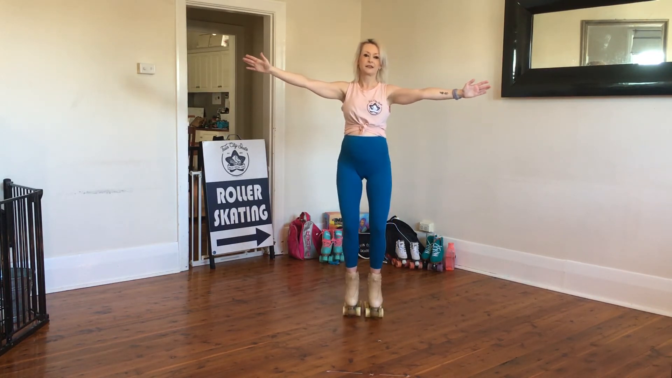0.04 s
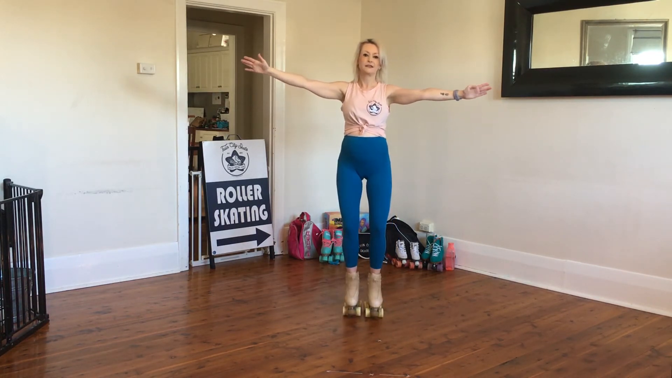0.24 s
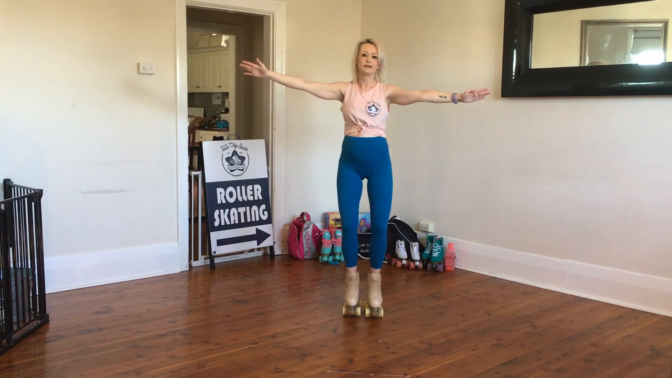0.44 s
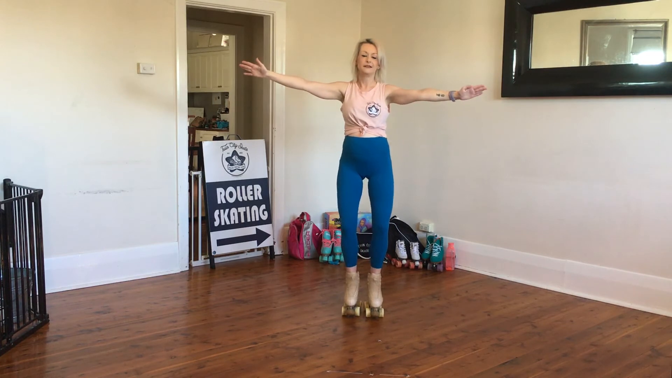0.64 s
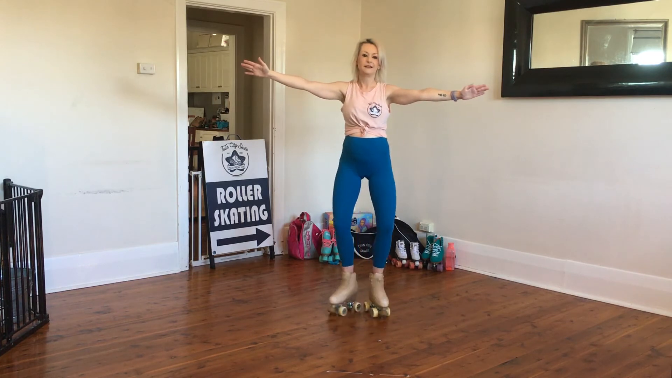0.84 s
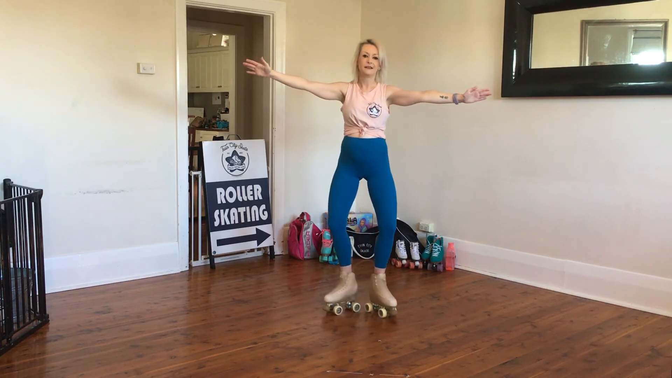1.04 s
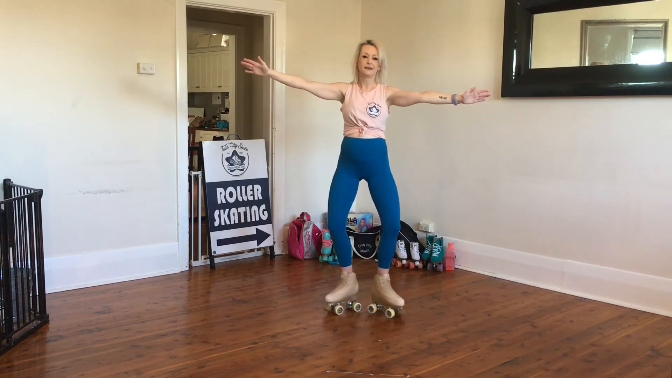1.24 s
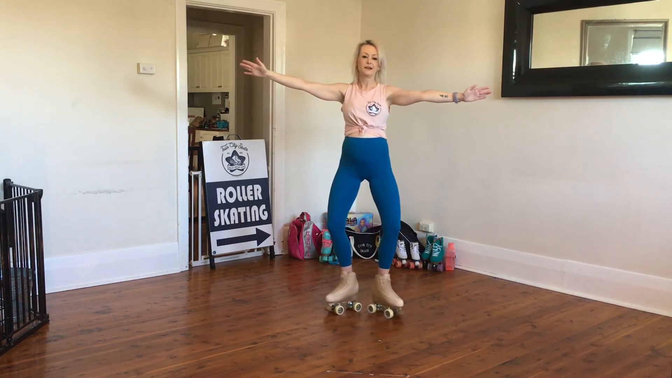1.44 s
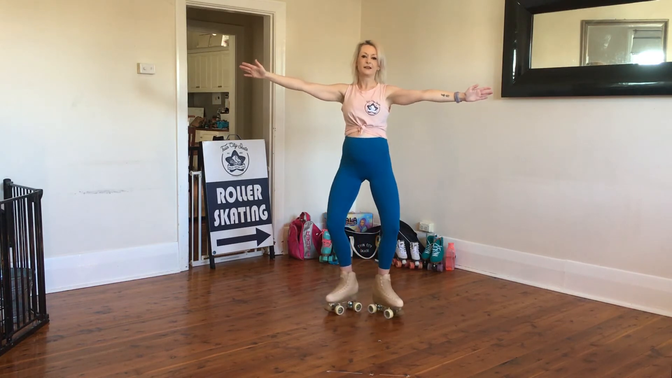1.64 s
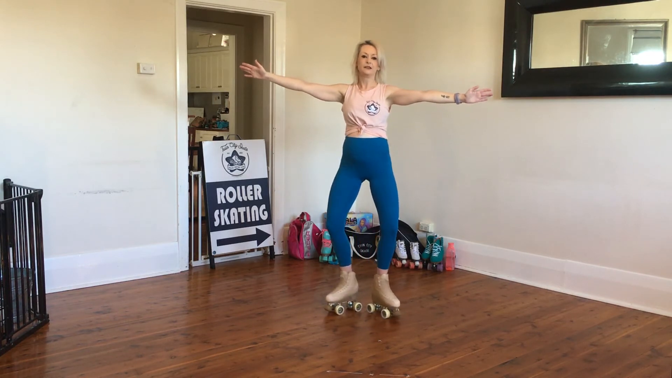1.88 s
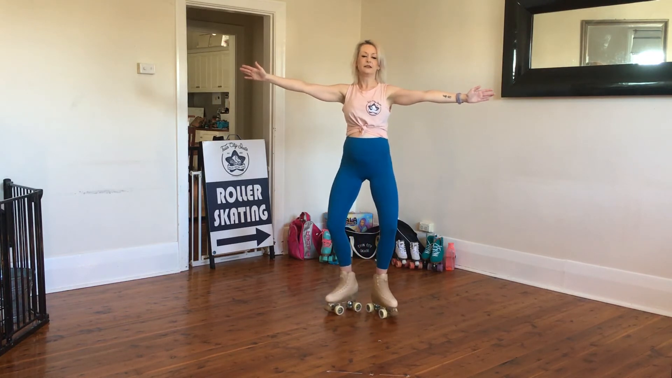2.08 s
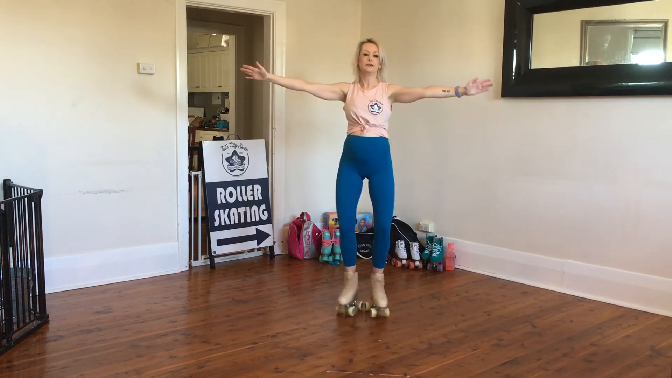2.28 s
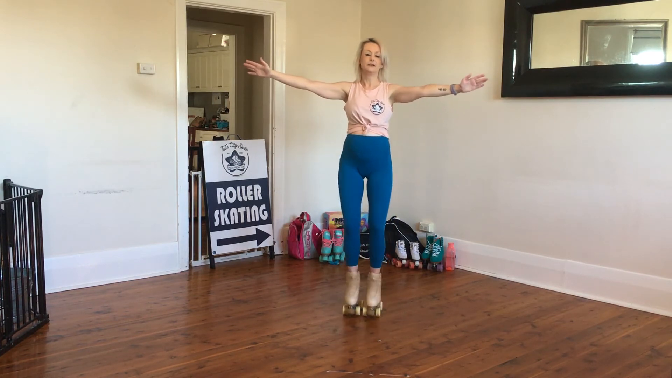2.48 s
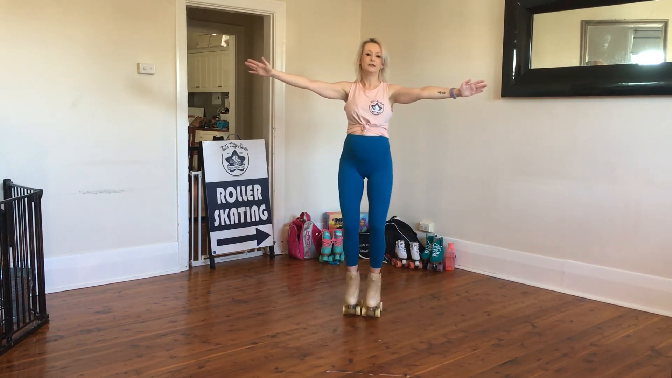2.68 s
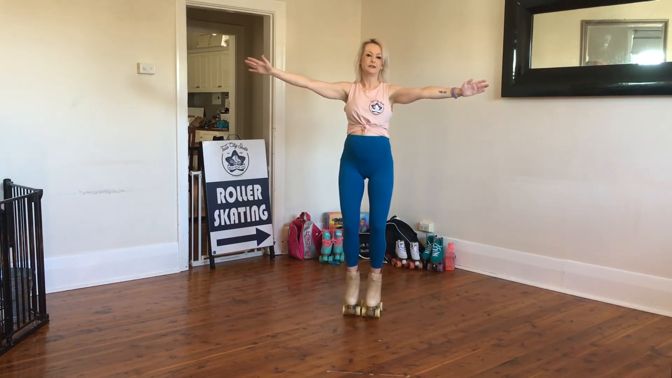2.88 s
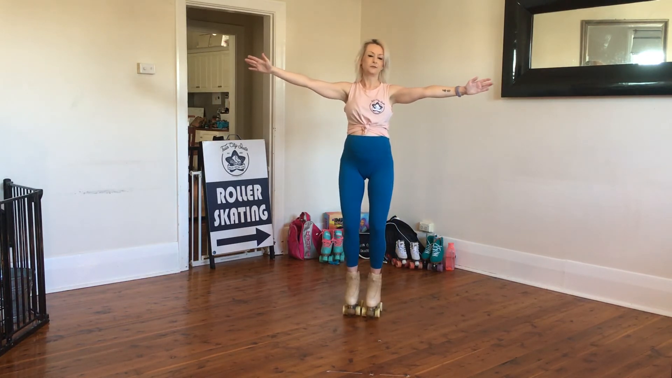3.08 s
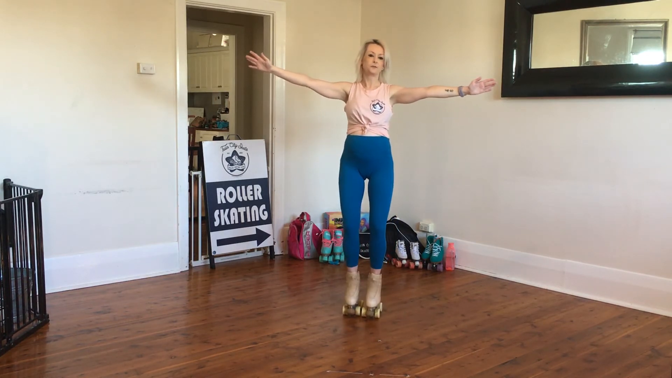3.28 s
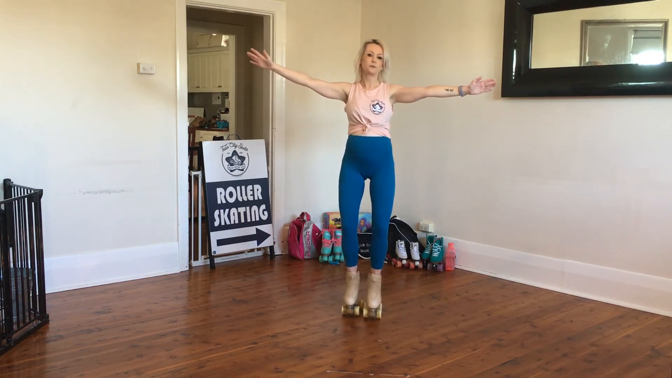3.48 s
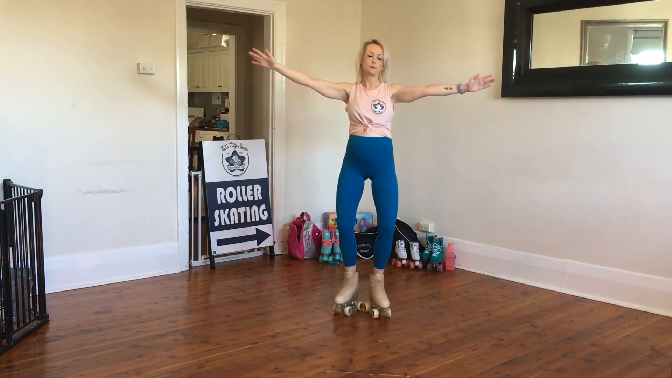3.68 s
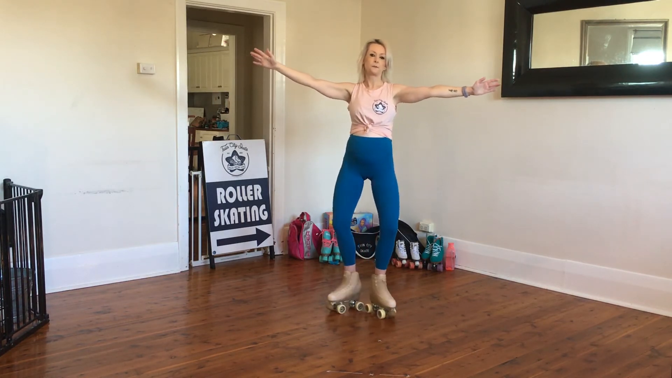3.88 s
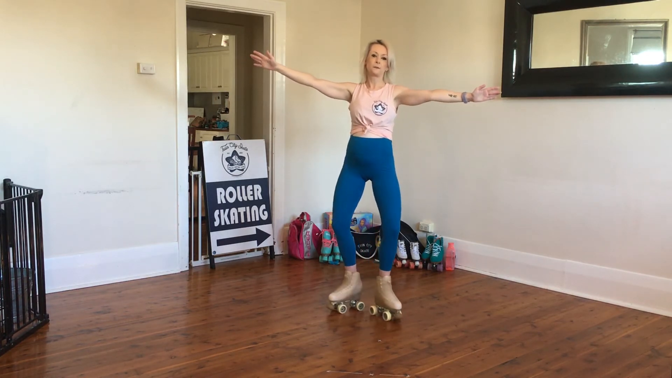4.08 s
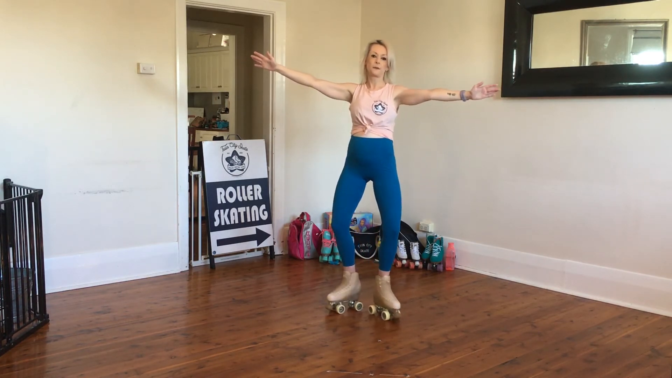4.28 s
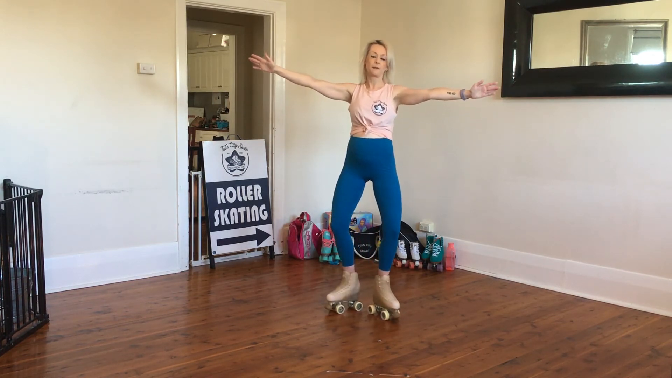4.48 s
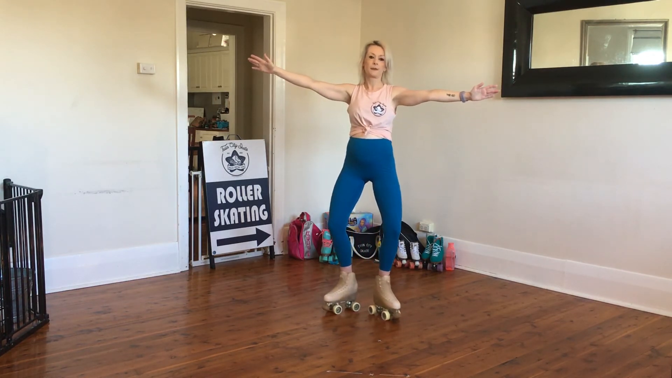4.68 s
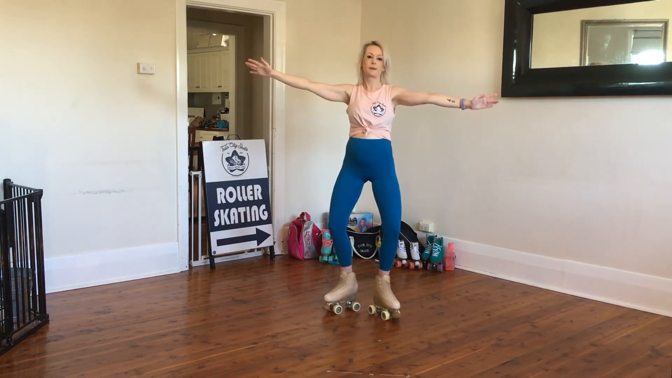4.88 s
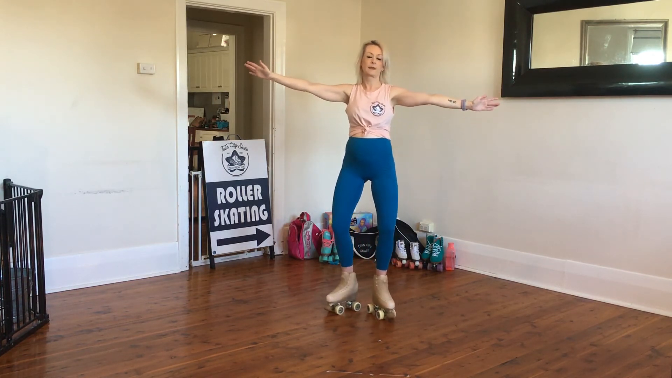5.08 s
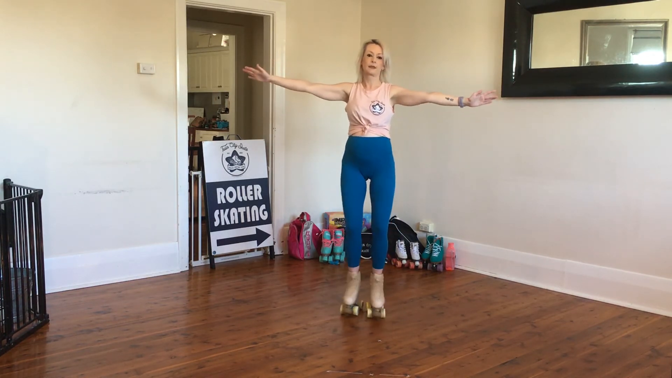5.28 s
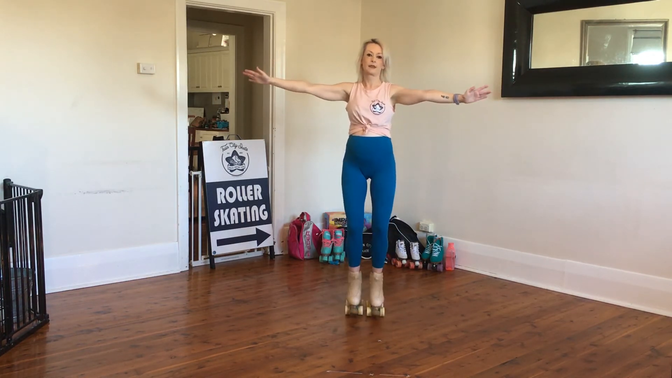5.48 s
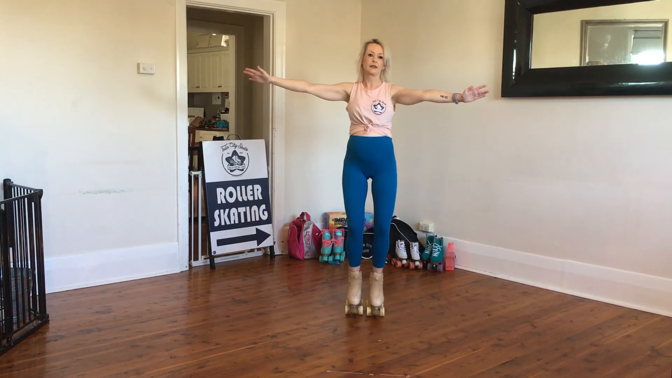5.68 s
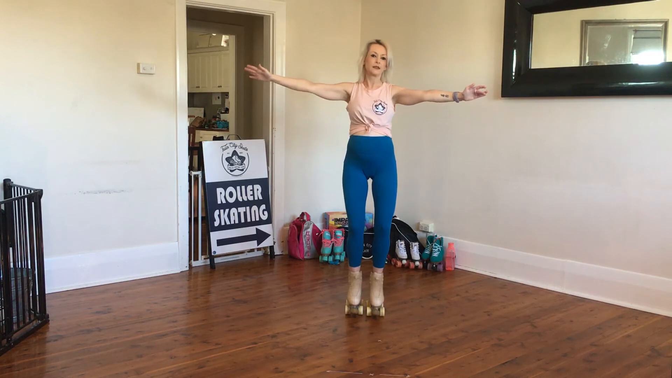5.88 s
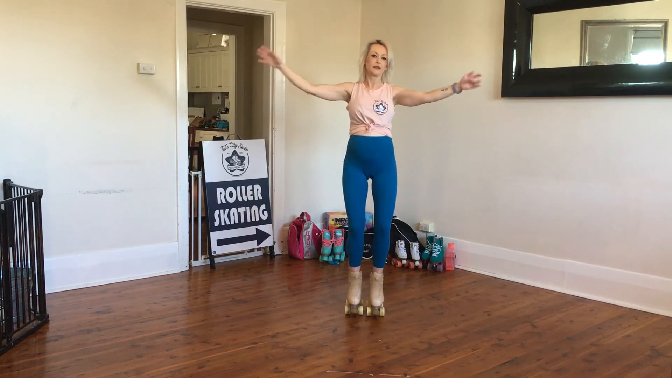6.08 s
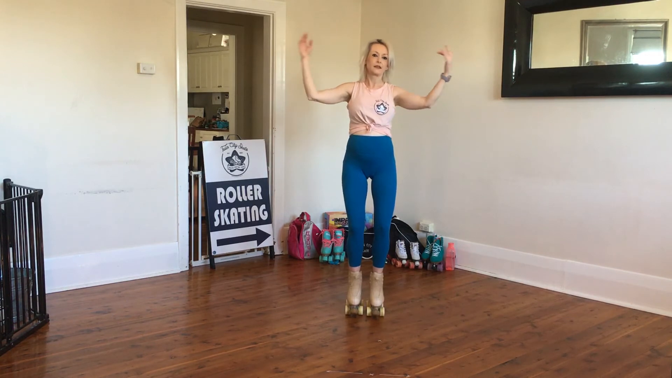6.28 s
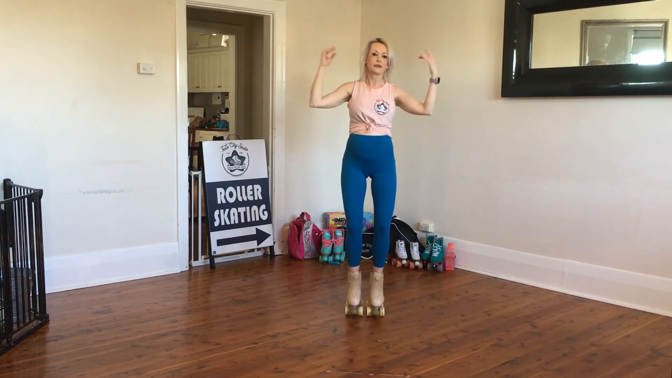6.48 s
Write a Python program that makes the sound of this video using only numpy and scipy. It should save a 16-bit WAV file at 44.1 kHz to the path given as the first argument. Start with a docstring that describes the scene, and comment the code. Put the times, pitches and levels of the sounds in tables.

```python
"""In a bare, echoing room with a wooden floor, a roller skater swivels her feet apart and together twice.
Shaped noise driven by wheel speed rumbles over the boards; ringing noise bursts knock as her weight shifts.
As the feet close, the inner wheels judder in short, rasping squeaks: gliding harmonics, pulsed noise
and metallic ringing. Cloth swishes, board thuds, an appliance hum and a late low drone lie underneath."""
import sys
import numpy as np
from scipy import signal
from scipy.fft import rfft, irfft, next_fast_len
from scipy.io import wavfile
from scipy.ndimage import map_coordinates

SR = 44100
rng = np.random.default_rng(int(sys.argv[2]) if len(sys.argv) > 2 else 0)


def generate_wav(sig):
    """Save sig (samples, or channels by samples) to the path in sys.argv[1] as 16-bit PCM at SR."""
    pcm = np.round(np.clip(np.atleast_2d(sig).T, -1, 1) * 32767).astype(np.int16)
    wavfile.write(sys.argv[1], SR, pcm)


N = 288096

# still air, noise colour: f/Hz, relative level/dB
AIR_COLOUR = [(18, -50.5), (28, -25.5), (45, -9.5), (80, -12), (110, -12.5), (135, -19.5), (170, -16),
              (205, -21.5), (290, -20.5), (500, -28), (1400, -34.5), (2400, -39.5), (4800, -45.5),
              (6000, -46), (9000, -47.5), (10400, -51.5), (12000, -48.5), (15500, -54)]
AIR_DB = -64.5
# appliance hum, one row per partial: f/Hz, mean rms level/dB
HUM_PARTIALS = [(99.9, -62.5), (52.7, -78.5)]
# reverb time across the spectrum: f/Hz, t60/s
ROOM_DECAY = [(100, 0.55), (260, 0.77), (700, 0.7), (1840, 1), (4850, 0.89), (8000, 0.6), (13000, 0.46)]
TOP_HZ = 15700  # upper band limit
# low drone: entry t/s, f/Hz, mean rms level/dB
LOW_DRONE = (6.12, 64, -59.5)
# a closing of the feet just before the start, its resonances: f/Hz, width/Hz, level/dB
OLD_RESONANCES = [(380, 38, -4.5), (642, 44, 0), (866, 31, -4)]
# the rasp of that closing, noise colour: f/Hz, relative level/dB
OLD_RASP_COLOUR = [(600, -26), (1050, 1), (2200, -5.5), (4500, -15), (6800, -21.5), (9000, -35),
                   (15000, -51)]
# leggings brush as the knees part and meet: centre t/s, half length to 1/e /s, peak level/dB
LEGGING_SWISHES = [(0.89, 0.15, -77), (2.363, 0.13, -73.5)]
# fabric, noise colour: f/Hz, relative level/dB
CLOTH_COLOUR = [(1500, -26), (4000, -2.5), (9000, 1), (14000, -4), (15700, -0.5)]
# low thud of the joists, noise colour: f/Hz, relative level/dB
JOIST_COLOUR = [(24, -38), (40, -11.5), (55, 2.5), (80, -7.5), (118, 3.5), (160, -5.5), (210, -11.5),
                (400, -58)]
# floorboards, noise colour: f/Hz, relative level/dB
BOARD_COLOUR = [(130, -30), (190, -5), (240, 1), (300, 5), (390, -6.5), (500, -15), (900, -24.5),
                (2000, -64.5)]
# a board gives under the weight: t/s, joist thump level/dB, board level/dB
BOARD_BUMPS = [ (0.541, -57, -56.5), (0.595, -61, -70), (0.815, -51, -52), (0.98, -50, -42),
               (1.355, -44.5, -48.5), (1.415, -51, -51), (1.525, -51.5, -63), (1.884, -48.5, -65),
               (2.025, -51, -58), (2.144, -54, -53.5), (3.371, -47, -57), (3.46, -47, -54),
               (4.08, -45.5, -62), (4.175, -50.5, -67), (4.344, -51.5, -65), (4.405, -57, -57.5),
               (4.795, -63, -54), (4.946, -64.5, -69.5), ]
BUMP_SWELL_S, BUMP_FADE_S = 0.011, 0.16  # build-up, then 20 dB down per fade time
# hiss of the wheel treads, noise colour: f/Hz, relative level/dB
TREAD_COLOUR = [(300, -17), (480, 0), (650, 9.5), (900, 4.5), (1400, -1.5), (2200, -7), (2800, -14),
                (3800, -12), (4900, -26), (6800, -17.5), (8000, -37), (15500, -41)]
# feet glide apart, together, apart, together: up to speed at t/s, slowing from t/s,
# run-up/s and run-out/s (20 dB of speed each), joist level/dB, board level/dB, tread level/dB
FOOT_GLIDES = [ (0.877, 1.03, 0.18, 0.37, -49.5, -47.5, -58.5), (2.32, 2.437, 0.24, 0.16, -50, -55, -56.5),
               (3.644, 3.972, 0.27, 0.45, -48.5, -50.5, -62.5),
               (5.135, 5.157, 0.14, 0.1, -51.5, -55.5, -65), ]
# powers of wheel speed that drive the layers (no unit): joists, boards, treads
SPEED_POWERS = (0.95, 1.15, 0.76)
# axles and bearings, resonances: f/Hz, width/Hz, level/dB
METAL_MODES = [(5250, 46, -1.5), (5620, 120, -4.5), (6910, 280, -7.5)]
# trucks and wheels knock as the weight shifts: t/s, scuff level/dB, scuff f/Hz, scuff 20 dB fade/s,
# metal level/dB, knock level/dB, knock f/Hz, thump level/dB
TRUCK_KNOCKS = [ (0.677, -63, 1150, 0.11, -92, -56, 670, -56),
                (1.293, -62.5, 2240, 0.09, -63.5, -45.5, 634, -58),
                (1.83, -70, 1440, 0.09, -95, -72, 600, -65),
                (2.019, -66, 1900, 0.015, -84.5, -53, 554, -52),
                (2.158, -80, 1500, 0.017, -93, -66, 490, -70),
                (3.358, -55.5, 1940, 0.017, -72, -56.5, 800, -47),
                (3.583, -50.5, 1400, 0.029, -74, -49.5, 700, -43.5),
                (3.822, -59, 2200, 0.017, -68, -48.5, 604, -56),
                (3.862, -51.5, 2100, 0.018, -61, -50.5, 900, -59),
                (3.965, -73, 1500, .02, -80, -59.5, 645, -53),
                (4.105, -65.5, 1280, .04, -90, -53, 670, -55),
                (4.308, -57.5, 1900, 0.038, -78, -56.5, 650, -60),
                (4.802, -76, 1500, .02, -89, -67, 524, -59), (5.01, -68.5, 1620, 0.13, -77, -71, 600, -70),
                (5.088, -66, 1510, 0.016, -88, -54.5, 540, -49), ]
# rasp of wheel on wheel, noise colour: f/Hz, relative level/dB
RASP_COLOUR = [(250, -47), (500, -4), (950, 0), (1350, -6), (1650, -15), (2300, -8.5), (3300, -9),
               (4600, -18), (7000, -17), (7900, -26), (9500, -26.5), (10400, -34), (15000, -37)]
# wheel against wheel: t/s, swell/s, 20 dB fade/s, starting slip rate f/Hz, glide/octaves per s,
# tone level/dB, octave level/dB, overtone level/dB, overtone tilt/dB per harmonic,
# rasp level/dB (before a 2 dB lift), metal level/dB, knock level/dB, knock f/Hz, thump level/dB
WHEEL_SQUEAKS = [ (2.428, 0.023, 0.048, 378.4, 1.0, -22.5, -20, -34, -3.5, -29.5, -47, -26.5, 460, -56),
                 (5.163, 0.013, 0.077, 327.2, 0.486, -29.5, -25, -31.5, -3.5, -32, -41, -30, 341, -38),
                 (5.287, 0.02, 0.013, 395.8, 0.69, -26.5, -31, -30.5, -22, -35, -60, -32.5, 446, -48.5), ]


def amp(db):
    """Decibels to gain."""
    return 10 ** (np.asarray(db) / 20)


def unit(x):
    """Scale x to rms 1."""
    return x / np.sqrt(np.mean(x ** 2) + 1e-20)


def along(points, hz):
    """Read (Hz, value) points on a log frequency axis."""
    f, v = np.transpose(points)
    return np.interp(np.log(hz + 1), np.log(f + 1), v)


def wobble(rate, size):
    """A smooth random curve with rate knots a second."""
    knots = rng.standard_normal(int(size * rate / SR) + 4)
    return map_coordinates(knots, [np.arange(size) * rate / SR])


def noise(colour, size):
    """Noise of rms 1 with the given colour."""
    hz = np.fft.rfftfreq(size, 1 / SR)
    spectrum = rfft(rng.standard_normal(size))
    return unit(irfft(spectrum * amp(along(colour, hz)), size))


def ringing(modes, size):
    """Noise of rms 1 through resonances whose gain halves one width from the centre."""
    hz = np.fft.rfftfreq(size, 1 / SR)
    gain = sum(amp(db) / (1 + ((hz - centre) / width) ** 2) for centre, width, db in modes)
    return unit(irfft(rfft(rng.standard_normal(size)) * gain, size))


def push(t, swell, fade):
    """Contact force: builds up, then lets go, falling 20 dB in each fade time."""
    return np.minimum(t / swell, 1) * amp(-20 * np.maximum(t - swell, 0) / fade)


def add(track, s, x):
    """Mix x into the track from time s."""
    part = track[round(s * SR):][:len(x)]
    part += x[:len(part)]


def die_away(x):
    """Fade each frequency of x at the room's own speed."""
    hz, t, z = signal.stft(x, SR, nperseg=256)
    decay = amp(-60 * t / along(ROOM_DECAY, hz)[:, None])
    return signal.istft(z * decay, SR, nperseg=256)[1]


def in_room(x, direct_db, gap=0.0023, early_db=-4, early_fade=0.019):
    """x across the room: direct sound, sparse reflections from floor and near walls, then a dense tail."""
    tail = die_away(rng.standard_normal(SR))
    t = np.arange(len(tail)) / SR
    sparse = rng.standard_normal(len(t)) * (rng.random(len(t)) < 0.01)
    early = sparse * amp(-20 * t / early_fade)
    response = tail / np.linalg.norm(tail) + amp(early_db) * early / np.linalg.norm(early)
    response *= 1 - np.exp(-t / gap)  # reflections build up after the direct sound
    response[0] += amp(direct_db)
    return signal.fftconvolve(x, response)


def room_tone(waver_db=1.5):
    """Still air as coloured noise, and an appliance hum of sines unsteady in level and phase."""
    t = np.arange(N) / SR
    hum = np.zeros(N)
    for hz, db in HUM_PARTIALS:
        level = amp(db + waver_db * wobble(5.1, N))
        hum += level * np.sqrt(2) * np.sin(2 * np.pi * hz * t + 0.28 * wobble(2.4, N))
    return hum + amp(AIR_DB) * noise(AIR_COLOUR, N)


def drone(rise=0.069):
    """A low sine rises in and wavers in level and phase."""
    s, hz, db = LOW_DRONE
    t = np.arange(N) / SR
    level = amp(db + 1.1 * wobble(2.8, N)) * np.clip((t - s) / rise, 0, 1)
    return level * np.sqrt(2) * np.sin(2 * np.pi * hz * t + 0.24 * wobble(15, N))


def lingering(body_db=-55, rasp_db=-58):
    """The room still rings from an earlier closing: body and rasp die away from the start."""
    out = np.zeros(N)
    body = amp(body_db) * ringing(OLD_RESONANCES, SR)
    rasp = amp(rasp_db) * noise(OLD_RASP_COLOUR, SR)
    add(out, 0, die_away(body + rasp))
    return out


def leggings():
    """Fabric slides on fabric in soft, airy swells of noise."""
    t = np.arange(N) / SR
    swells = sum(amp(db) * np.exp(-((t - s) / length) ** 2) for s, length, db in LEGGING_SWISHES)
    return swells * noise(CLOTH_COLOUR, N)


def bumps():
    """Weight comes onto a board: it booms briefly and the joists thud under it."""
    out, t = np.zeros(N), np.arange(SR // 2) / SR
    force = push(t, BUMP_SWELL_S, BUMP_FADE_S)
    for s, thump_db, board_db in BOARD_BUMPS:
        thump = amp(thump_db) * noise(JOIST_COLOUR, len(t)) * force
        board = amp(board_db) * noise(BOARD_COLOUR, len(t)) * force
        add(out, s, thump + board)
    return out


def rolling(uneven_db=0.94, grain_db=-2.0):
    """Each glide gathers speed, holds it and runs out; the speed drives joists, boards and treads."""
    out, t = np.zeros(N), np.arange(N) / SR
    uneven = amp(uneven_db * wobble(35, N))
    treads = noise(TREAD_COLOUR, N) * amp(grain_db * wobble(240, N))
    layers = [noise(JOIST_COLOUR, N), noise(BOARD_COLOUR, N), treads]
    for fast, slowing, run_up, run_out, *levels_db in FOOT_GLIDES:
        before = np.maximum(fast - t, 0) / run_up
        after = np.maximum(t - slowing, 0) / run_out
        speed = amp(-20 * (before + after))
        for db, power, layer in zip(levels_db, SPEED_POWERS, layers):
            out += amp(db) * speed ** power * layer
    return out * uneven


def knocks(scuff_width=0.61, knock_width=0.23):
    """A truck tips over: the wheel scuffs, the axle clicks, the board knocks and the joists thump."""
    out, t = np.zeros(N), np.arange(SR // 4) / SR
    size = len(t)
    for s, scuff_db, scuff_hz, scuff_fade, metal_db, knock_db, knock_hz, thump_db in TRUCK_KNOCKS:
        # widths scale with pitch
        scuff = amp(scuff_db) * ringing([(scuff_hz, scuff_width * scuff_hz, 0)], size)
        scuff *= push(t, 0.0027, scuff_fade)
        metal = amp(metal_db) * ringing(METAL_MODES, size) * push(t, 0.0012, 0.014)
        knock = amp(knock_db) * ringing([(knock_hz, knock_width * knock_hz, 0)], size)
        knock *= push(t, 0.006, 0.055)
        thump = amp(thump_db) * noise(JOIST_COLOUR, size) * push(t, 0.013, 0.07)
        add(out, s, in_room(scuff + metal + knock + thump, direct_db=-4.5))
    return out


def squeaks(grit_db=3, bite=0.0082, knock_width_hz=60, jitter=0.052):
    """Colliding wheels stick and slip; every slip throws off a puff of rasp and shakes the axles."""
    out, t = np.zeros(N), np.arange(SR // 2) / SR
    size = len(t)
    for (s, swell, fade, hz, glide, tone_db, octave_db, over_db, tilt_db,
         rasp_db, metal_db, knock_db, knock_hz, thump_db) in WHEEL_SQUEAKS:
        force = push(t, swell, fade)
        # the slip rate glides and jitters
        rate = hz * 2 ** (glide * np.minimum(t, swell + fade)) * (1 + jitter * wobble(218.1, size))
        phase = 2 * np.pi * np.cumsum(rate) / SR
        overtones = sum(amp(tilt_db * k) * np.sin((k + 3) * phase) for k in range(6))
        tone = amp(tone_db) * np.sin(phase)
        tone += amp(octave_db) * np.sin(2 * phase) + amp(over_db) * overtones
        slips = unit((2 + np.cos(phase)) * amp(grit_db * wobble(394, size)))
        # the treads scrape at once on touching; the judder needs time to build
        scrape = slips * np.sqrt(force * push(t, bite, fade))
        rasp = amp(rasp_db + 2) * noise(RASP_COLOUR, size)
        metal = amp(metal_db) * ringing(METAL_MODES, size)
        judder = tone * force * np.minimum(t / swell, 1)
        body = amp(knock_db) * ringing([(knock_hz, knock_width_hz, 0)], size) * force
        thump = amp(thump_db) * noise(JOIST_COLOUR, size) * push(t, 0.037, 0.24)
        low = in_room(judder + body + thump, direct_db=-3.5)
        high = in_room(scrape * (rasp + metal), direct_db=-5.0)
        add(out, s, low + high)
    return out


def scene():
    """Room, skater and skates mixed to one channel."""
    background = room_tone() + drone() + lingering()
    skater = leggings() + bumps()
    skates = rolling() + knocks() + squeaks()
    return (background + skater + skates)[None]


def record(dry):
    """Cut everything from TOP_HZ up with a steep band limit."""
    size = next_fast_len(N + SR // 2)
    kept = np.fft.rfftfreq(size, 1 / SR) < TOP_HZ
    return irfft(rfft(dry, size) * kept, size)[:, :N]


dry = scene()
out = record(dry)
generate_wav(out)
```